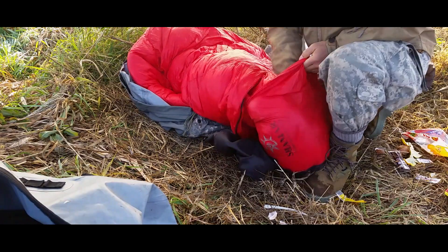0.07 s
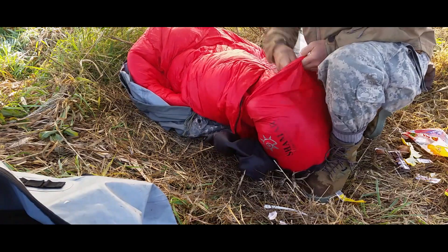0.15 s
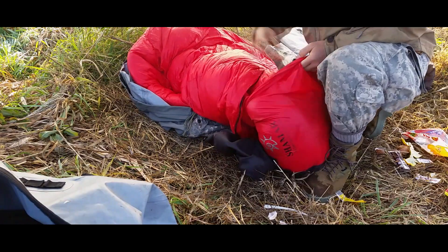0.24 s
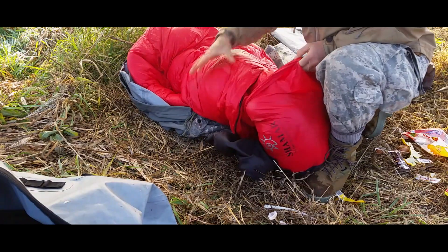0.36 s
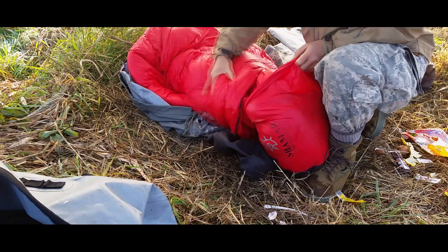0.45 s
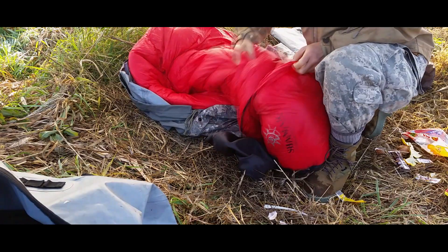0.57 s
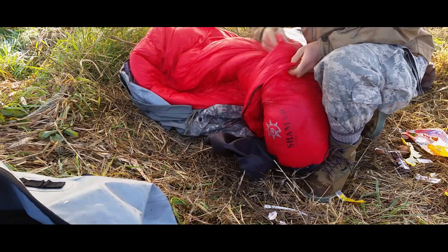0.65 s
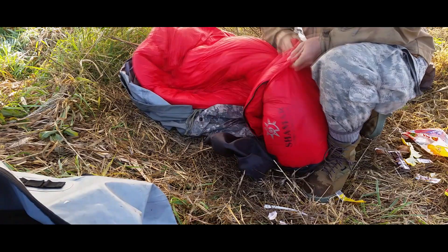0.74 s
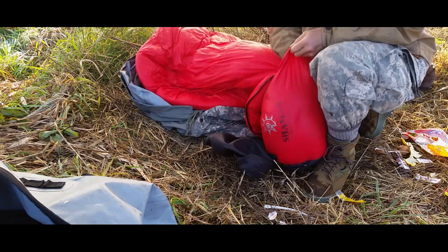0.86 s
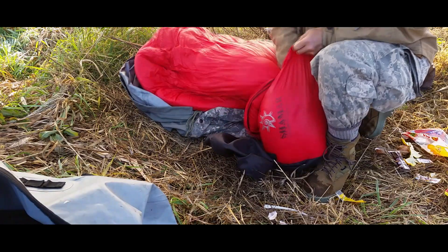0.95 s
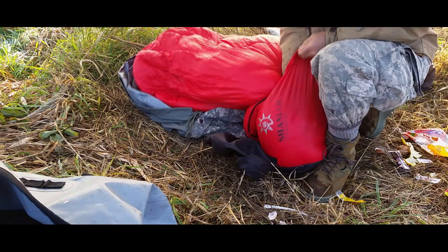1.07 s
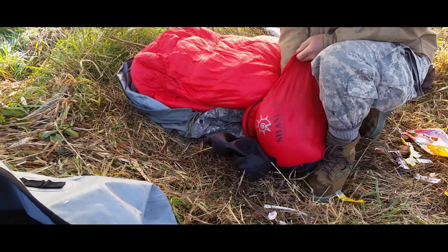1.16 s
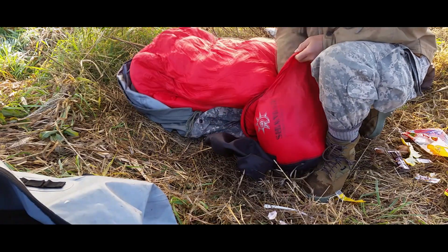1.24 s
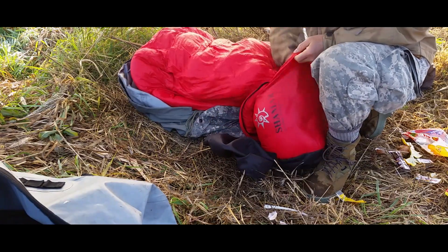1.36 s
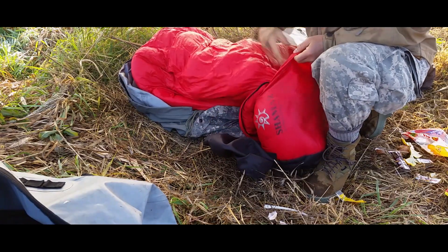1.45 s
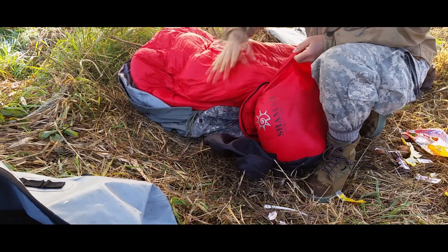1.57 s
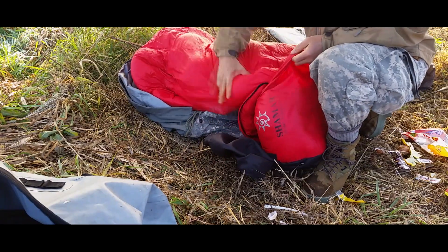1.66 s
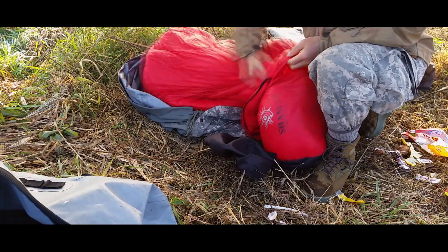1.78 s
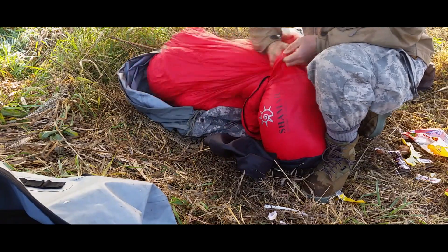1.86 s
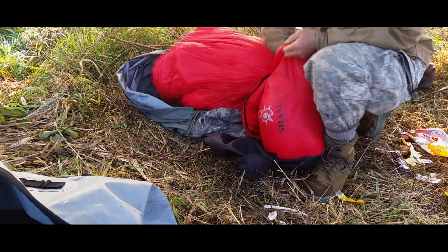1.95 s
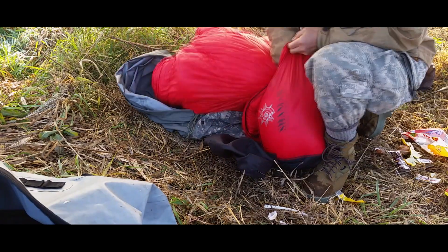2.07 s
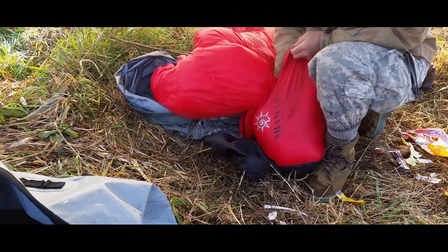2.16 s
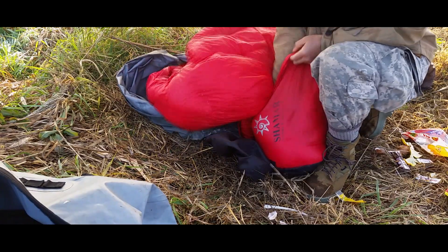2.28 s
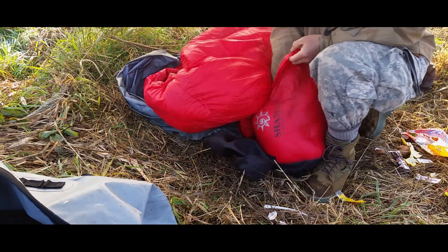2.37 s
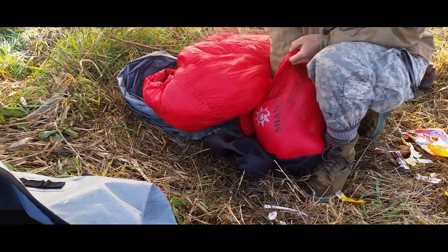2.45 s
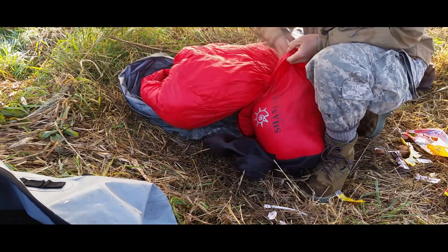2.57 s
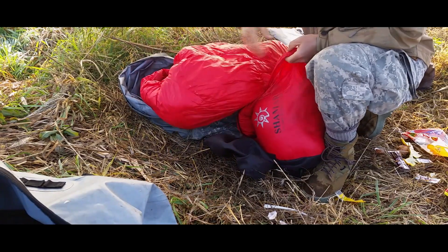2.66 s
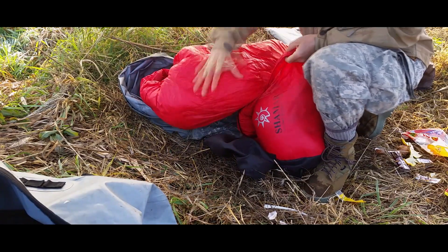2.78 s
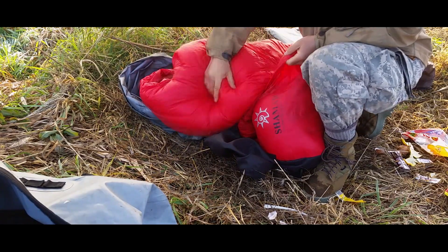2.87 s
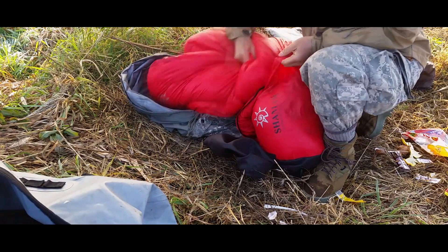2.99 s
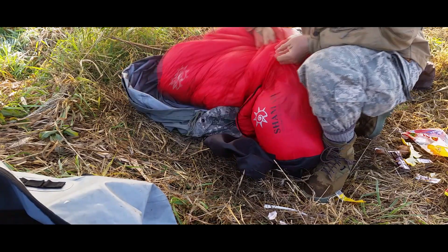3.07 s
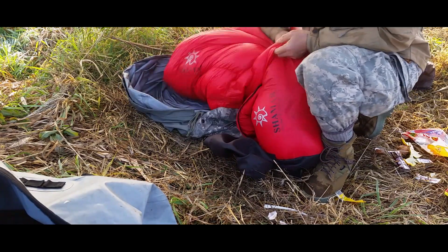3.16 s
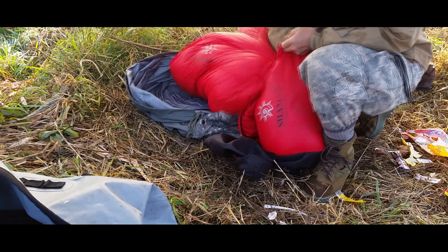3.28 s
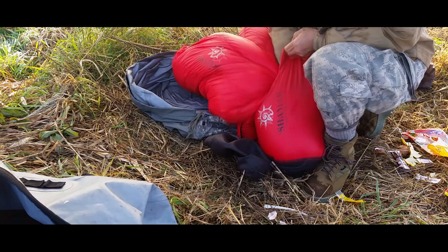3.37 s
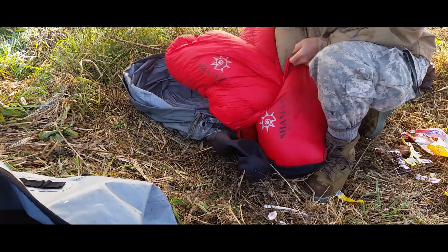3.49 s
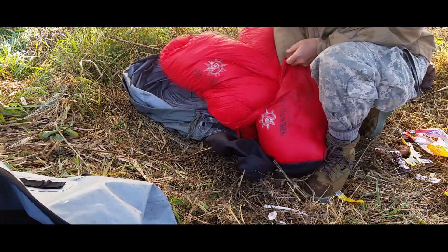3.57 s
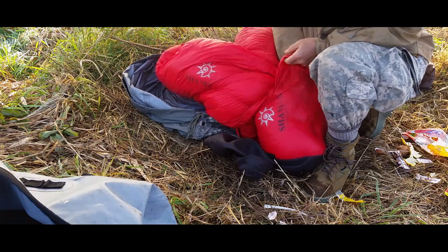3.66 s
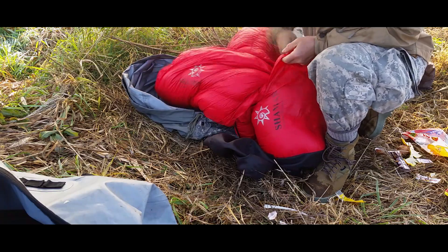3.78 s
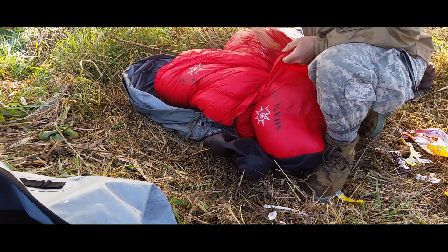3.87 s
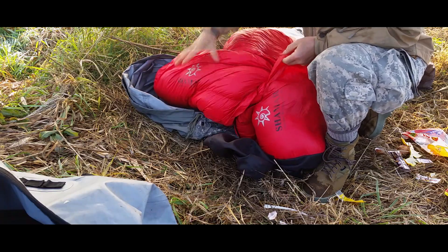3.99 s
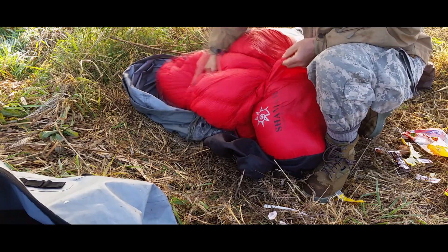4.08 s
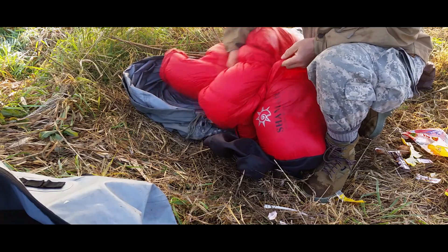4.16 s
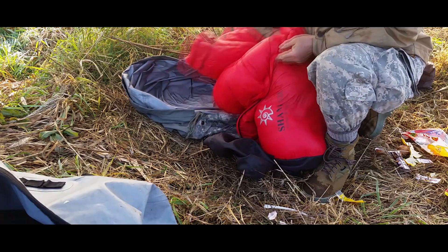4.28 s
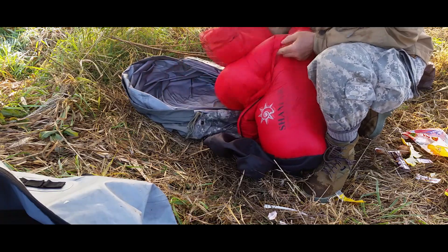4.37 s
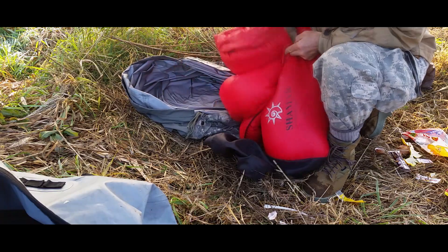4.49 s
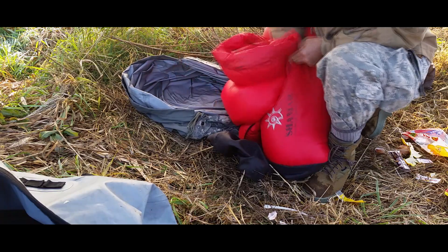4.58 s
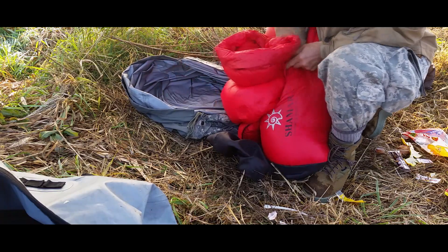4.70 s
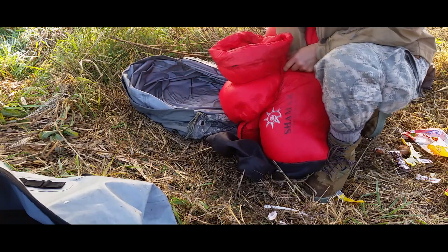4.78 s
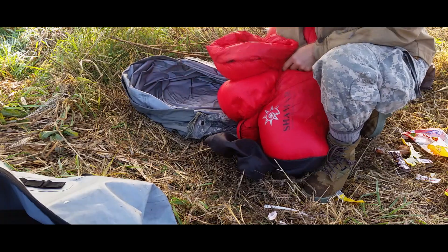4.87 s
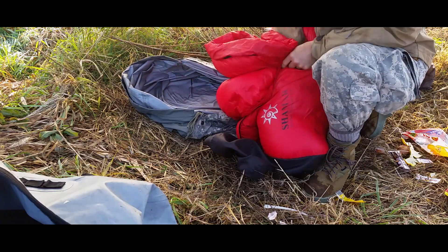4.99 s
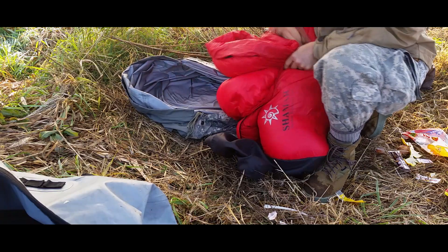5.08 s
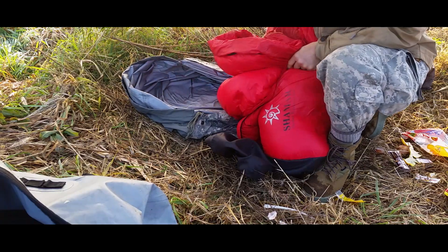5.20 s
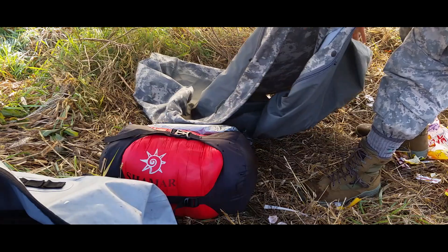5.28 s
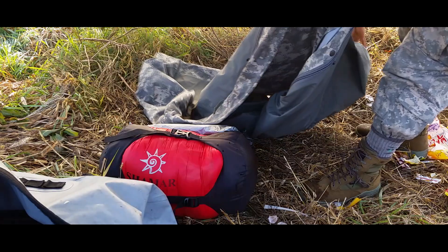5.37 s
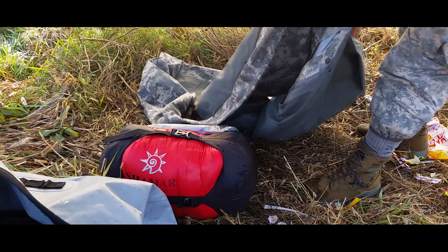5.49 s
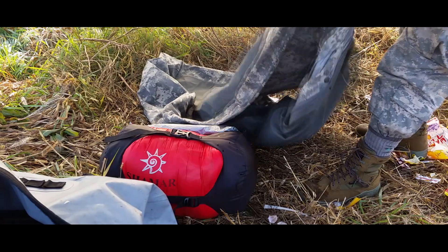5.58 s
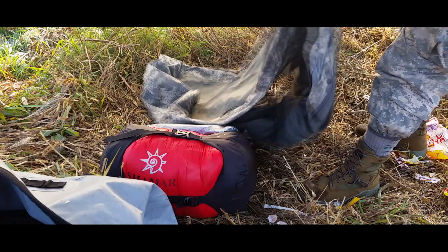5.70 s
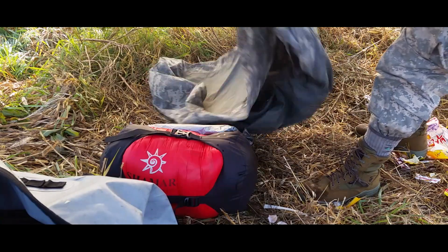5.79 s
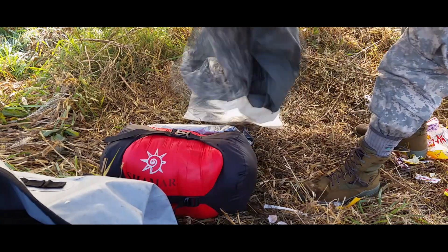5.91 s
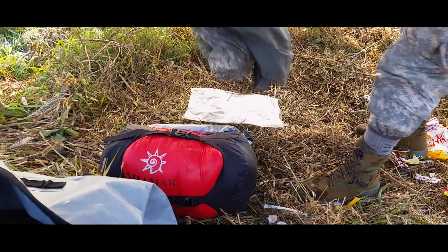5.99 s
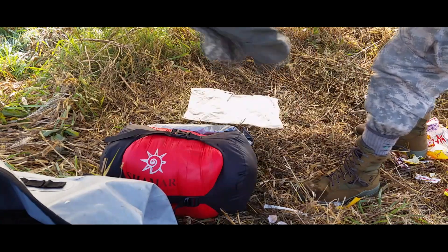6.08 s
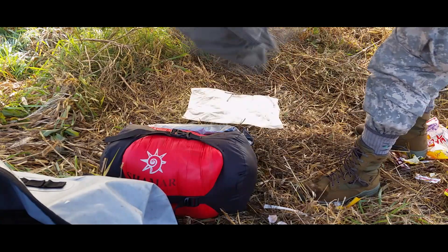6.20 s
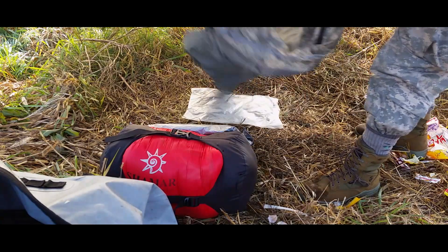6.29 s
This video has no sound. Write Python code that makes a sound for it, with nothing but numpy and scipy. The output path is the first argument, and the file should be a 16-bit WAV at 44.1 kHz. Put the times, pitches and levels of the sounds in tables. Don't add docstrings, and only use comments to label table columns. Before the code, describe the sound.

Nylon sleeping bag stuffed into its sack on dry grass in four swishing pushes, then a stiff cover shaken with loud crackling flaps close by.

```python
import sys
import numpy as np
from scipy import signal
from scipy.fft import rfft, irfft, next_fast_len
from scipy.io import wavfile
from scipy.ndimage import uniform_filter1d, map_coordinates

SR = 44100
rng = np.random.default_rng(int(sys.argv[2]) if len(sys.argv) > 2 else 0)


def how_loud(loudness_db):
    steps = np.asarray(loudness_db, float) / 20
    return 10 ** steps


def output_pcm(signal):
    pcm = np.clip(np.atleast_2d(signal).T, -1, 1) * 32767
    wavfile.write(sys.argv[1], SR, np.round(pcm).astype(np.int16))


N = 279726

COVER_S = 5.282
# centre_s, peak_db, pitch_hz, length_cycles
SLAPS = [(.337, -51, 302, .6), (0.469, -43.5, 128, 0.89), (.503, -45, 150, 0.5), (1.0022, -28, 336, 0.11),
         (1.0912, -31.5, 200, 0.27), (1.7073, -41.5, 298, 0.51), (1.809, -43, 250, 0.56),
         (2.181, -36.5, 200, 0.52), (2.2031, -24, 340, 0.11), (2.676, -53, 200, 0.42),
         (2.864, -41, 150, 0.67), (2.942, -51, 350, 1.5), (3.474, -37.5, 255, 0.47),
         (4.0952, -42, 60, 0.14), (4.0985, -31, 124, 0.62), (4.147, -45, 303, 0.56),
         (4.171, -48, 110, 0.46), (4.601, -34, 407, 0.33), (5.304, -54, 250, 0.67), (5.367, -42, 180, 0.55),
         (5.449, -36, 342, 0.22), (5.588, -46, 300, .8), (5.622, -47.5, 387, 1.3), (6.055, -36, 480, 1.2),
         (6.075, -29, 765, 1.4), (6.14, -18, 467, 1.8), (6.191, -16, 434, 1.33), (6.284, -24, 390, 1.2),
         (6.299, -13, 413, 0.85), (6.331, -21, 437, 1.06)]


def unit(x):
    return x / np.sqrt(np.mean(x ** 2) + 1e-20)


def along(points, hz):
    f, v = np.transpose(points)
    return np.interp(np.log(hz + 1), np.log(f + 1), v)


def wobble(rate):
    knots = rng.standard_normal(int(N * 400 / SR) + 4)
    return map_coordinates(knots, [np.arange(N) * rate / SR])


def together(*dbs):
    return 10 * np.log10(sum(how_loud(db) ** 2 for db in dbs) + 1e-12)


def ports(pair, spectrum, bag, lag_share):
    # pitch_hz, likeness for the bag (0-1), likeness for the wide cover (0-1),
    # left_lag_radians, left_minus_right_db
    port_table = [(30, .99, .99, 0, -.9), (350, .97, .96, 0, -.5), (1200, .85, .77, .3, .2),
                  (2750, .57, .6, 1.0, -2.2), (3800, .37, .35, 1.6, -2.8), (5400, .45, .22, 2.3, -6.4),
                  (7250, .55, .4, 3.15, -.3), (9000, .4, .1, 4.8, 6.2), (10300, .55, .13, 5.5, -4),
                  (12000, .4, .15, 5.7, -2), (14000, .5, .1, 6.5, -2.6)]
    hz, bag_alike, cover_alike, lag, side_db = np.transpose(port_table)
    m = next_fast_len(N + SR // 10)
    f = np.fft.rfftfreq(m, 1 / SR)

    def read(values):
        return along(np.c_[hz, values], f)

    turn = np.arccos(read(bag_alike if bag else cover_alike)) / 2
    mid, side = rfft(pair, m) * how_loud(along(spectrum, f)) * [np.cos(turn), np.sin(turn)]
    half = how_loud(read(side_db) / 2) * np.exp(-.5j * lag_share * read(lag))
    return irfft([(mid + side) * half, (mid - side) / half], m)[:, :N]


def heard(bag_pair, bag_spectrum, cover_pair, cover_spectrum):
    bag = unit(ports(bag_pair, bag_spectrum, True, lag_share=0.98))
    cover = unit(ports(cover_pair, cover_spectrum, False, lag_share=-.5))
    return np.where(np.arange(N) > COVER_S * SR, cover, bag)


def meadow(crumple_db):
    # pitch_hz, density_db
    far = [(15, -46), (25, -5.5), (91, 7), (160, -2), (210, -29), (350, -120)]
    # pitch_hz, density_db
    air = [(88, -34), (150, -2), (459, -12), (1460, -20.5), (4120, -24), (6180, -29.5), (7210, -29.5),
           (7940, -26.5), (13600, -20), (15000, -65)]
    lumps = how_loud(0.73 * wobble(14)) * rng.standard_normal((2, N))
    rumble = unit(ports(lumps, far, False, lag_share=0))
    hush = unit(ports(rng.standard_normal((2, N)), air, False, lag_share=0))
    traffic_db = -59.5 - 0.5 * wobble(2.85)
    pushed_air_db = -52.5 + 0.85 * (crumple_db + 49.5)
    return how_loud(together(traffic_db, pushed_air_db)) * rumble + how_loud(-61.5) * hush


def seam():
    # time_s, pitch_hz, level_db
    whistle = [(5.59, 5170, -95), (5.62, 5170, -67), (5.7, 5150, -66), (5.73, 5150, -61), (5.76, 5050, -68),
               (5.79, 5050, -95), (6.03, 5020, -95), (6.05, 5030, -65), (6.1, 5030, -62)]
    stop = (whistle[-1][0] + .01, 5030, -120)
    s, pitch_hz, level_db = np.transpose(np.vstack([whistle, stop]))
    t = np.arange(N) / SR
    hz = np.interp(t, s, pitch_hz) + 15 * wobble(60)
    db = np.interp(t, s, level_db) + 5.5 + 1.5 * wobble(30)
    return how_loud(db) * np.sin(2 * np.pi * np.cumsum(hz) / SR)


def snaps():
    # start_s, peak_db, pitch_hz, t60_s
    creases = [(.4455, -54, 5000, .03), (1.553, -43, 10600, .15), (1.556, -51, 1480, 0.076),
               (1.571, -44.5, 3000, .008), (1.7053, -40.5, 960, 0.026), (2.2, -42, 2000, 0.0034),
               (2.858, -35.5, 9500, 0.006), (2.858, -45, 1250, 0.059), (2.925, -45, 880, 0.33),
               (4.089, -42, 2200, 0.026), (4.0956, -35.5, 500, 0.016), (4.1445, -44, 1000, 0.056),
               (5.423, -44, 4000, .006), (5.766, -15, 10000, 0.0056), (5.587, -39, 8000, .006),
               (5.914, -25, 13000, .006), (5.9775, -18.5, 12000, 0.0048), (6.0725, -31, 990, 0.036),
               (6.148, -16, 11500, 0.0088), (6.154, -23, 6500, 0.0088), (6.158, -17, 1260, 0.053),
               (6.175, -22, 2480, 0.0042), (6.181, -8.5, 1800, 0.027), (6.22, -20.5, 2740, 0.021),
               (6.2483, -21, 2820, 0.01), (6.25, -19, 1390, 0.0066), (6.288, -20.5, 2380, 0.011),
               (6.335, -17, 1570, 0.025), (6.337, -17.5, 11400, 0.0066)]
    out = np.zeros((2, N + SR))
    t = np.arange(SR // 20) / SR
    for s, db, hz, t60 in creases:
        q = (hz / 1000) ** 0.32 / 1.21
        band = signal.iirpeak(hz, q, SR)
        decay = how_loud(-60 * t / t60) + how_loud(-20 - 15 * t / t60)
        noise = rng.standard_normal((2, len(t))) * decay
        tick = signal.lfilter(*band, signal.lfilter(*band, noise))
        out[:, round(s * SR):][:, :len(t)] += how_loud(db) * tick / np.abs(tick[0]).max()
    early = np.arange(N) < COVER_S * SR
    flat = [(100, 0)]
    bag = ports(out[:, :N] * early, flat, True, lag_share=1)
    cover = ports(out[:, :N] * ~early, flat, True, lag_share=-0.26)
    return bag + cover


def slaps(crumple_db):
    reach = SR // 40
    out = np.zeros(N + SR)
    t = np.arange(-reach, reach) / SR
    crackle_band = signal.butter(2, [500, 2800], "band", fs=SR)
    for s, db, hz, cycles in SLAPS:
        turns = hz * t * np.where(t < 0, 1.25, .85)
        push = -np.cos(2 * np.pi * turns) * np.exp(-(turns / cycles) ** 2)
        push *= np.sign(cycles - .2)
        grit = unit(signal.lfilter(*crackle_band, rng.standard_normal(len(t))))
        burst = grit * (t > -.0012) * how_loud(-60 * t / .01)
        crackle_db = crumple_db[round(s * SR)] + 0.5
        out[round(s * SR) - reach:][:len(t)] += how_loud(db) * push + how_loud(crackle_db) * burst
    return out[:N]


def motion():
    # start_s, end_s, slide_start_db, slide_end_db, crumple_over_slide_db
    grabs = [
        (.445, .57, -57, -61, -5),
        (1.647, 1.69, -62, -60, -2),
        (1.708, 1.93, -54, -57, -3.5),
        (2.846, 3.14, -59.5, -55, -1),
        (4.062, 4.08, -62, -58.5, -0.5),
        (4.082, 4.2, -53, -60, -4.5),
        (5.285, 5.38, -50, -55.5, -4.5),
    ]
    pushes = [
        (.945, 1.07, -43, -39.5, -7),
        (2.09, 2.21, -45, -39, -6),
        (3.33, 3.455, -43, -42, -5.5),
        (4.51, 4.61, -40.5, -39, -4.5),
    ]
    eases = [(0.0, .12, -55.5, -50, -8), (.14, .21, -50.5, -56, -6.5), (.61, .9, -56.5, -54.5, -2),
             (1.25, 1.47, -52, -51, -7), (1.565, 1.58, -61.5, -59.5, -0.5),
             (1.95, 2.07, -54.5, -51.5, -2.5), (2.33, 2.575, -54, -47, -7), (3.22, 3.3, -57.5, -49.5, 1.5),
             (3.62, 3.71, -55.5, -55.5, -2.5), (3.75, 3.92, -52.5, -60, -3.5), (4.3, 4.42, -55.5, -55, -1),
             (4.75, 4.9, -52.5, -52, -4.5), (4.95, 5.125, -54, -52, -4.5)]
    shakes = [
        (5.4, 5.53, -56.5, -60.5, -1.5),
        (5.55, 5.76, -55, -41, -4.5),
        (5.79, 5.865, -46, -40, -5.5),
        (5.875, 5.98, -43.5, -40.5, -1.5),
        (6.03, 6.1, -44, -49.5, -3),
        (6.135, 6.185, -31.5, -29.5, 1.5),
        (6.205, 6.245, -34, -38.5, 3),
        (6.265, 6.293, -35, -34.5, -0.5),
        (6.325, 6.35, -39, -33, 3),
    ]
    kinds = [(grabs, 0.0056, 0.09, 0.099, 0.1), (pushes, 0.11, .085, 3.0, 1.7),
             (eases, 0.33, 0.08, 2.2, -1), (shakes, 0.06, 0.078, 0.96, -2.4)]
    t = np.arange(0, N, 16) / SR
    slides, crumples = [], []
    for rows, attack_s, release_s, arch_db, gain_db in kinds:
        for start, end, start_db, end_db, crumple_db in rows:
            u = np.clip((t - start) / (end - start), 0, 1)
            held = start_db + (end_db - start_db) * u - 20 * np.maximum(start - t, 0) / attack_s
            gone = 20 * np.maximum(t - end, 0) / release_s
            slides.append(held + arch_db * np.sin(np.pi * u) - gone)
            crumples.append(held + crumple_db + gain_db * (u - .5) - gone / 1.49)
    puffs = together(*[db - 13.5 - 20 * np.abs(t - s) / 0.026 for s, db, _, _ in SLAPS])
    levels = (together(*slides), together(*crumples), puffs)
    slide_db, crumple_db, puff_db = [np.interp(np.arange(N) / SR, t, v) for v in levels]
    billow_db = 0.35 * np.maximum(crumple_db + 41, 0)
    flap_db = together(crumple_db - 3 + billow_db + 1.22 * wobble(14), puff_db)
    return slide_db, crumple_db + 1.1 * wobble(18), flap_db


def whine(hz, width):
    m = next_fast_len(N + SR // 4)
    f = np.fft.rfftfreq(m, 1 / SR)
    blur = irfft(rfft(rng.standard_normal((4, N)), m) / (1 + (f / width) ** 2), m)[:, :N]
    turn = 2 * np.pi * np.cumsum(hz) / SR
    return unit(blur[:2] * np.cos(turn) + blur[2:] * np.sin(turn))


def slips(spread_db, clump_db, clump_rate, patchy_db, patch_bins):
    starts = (rng.random(N) < clump_rate / SR) * rng.random(N)
    clumps = unit(signal.lfilter([1], [1, -np.exp(-clump_rate / SR)], starts))
    uneven = uniform_filter1d(rng.exponential(size=N), size=3)
    size = how_loud(spread_db * uneven + clump_db * clumps)
    z = signal.stft(size * rng.standard_normal((2, N)), nperseg=256)[2]
    patches = uniform_filter1d(rng.standard_normal(z.shape[1:]), patch_bins, axis=0)
    patches = uniform_filter1d(patches, size=9, axis=1)
    return unit(signal.istft(z * how_loud(patchy_db * unit(patches)), nperseg=256)[1][:, :N])


def cloth(slide_db, crumple_db, flap_db):
    # pitch_hz, density_db
    weave = [(2650, -19), (4500, -16.5), (5450, -14), (7330, -16), (8690, -7), (10400, -3), (12000, -6.5),
             (14700, -9), (15300, -9), (16000, -20)]
    # pitch_hz, density_db
    bag_creases = [(290, -11), (500, -18), (630, -12.5), (970, -8), (3230, -10.5), (4260, -14.5),
                   (5430, -15.5), (7000, -10.5), (9100, -25), (15400, -120)]
    # pitch_hz, density_db
    cover_creases = [(290, -51), (500, -13), (540, -15), (878, -10.5), (1110, -7.5), (1480, -10),
                     (2740, -13), (4450, -20.5), (7000, -23.5), (9100, -53), (15400, -120)]
    # pitch_hz, density_db
    bag_flap = [(76, -27), (130, -2), (280, -4), (323, -6.5), (700, -10.5), (910, -11.5), (1540, -120)]
    # pitch_hz, density_db
    cover_flap = [(76, -24), (130, -2), (204, -3.5), (356, -3.5), (539, -9.5), (700, -7.5), (910, -5),
                  (1540, -120)]
    hiss = slips(spread_db=3, clump_db=1.3, clump_rate=90, patchy_db=1.6, patch_bins=8)
    weave_hz = 10640 + 178.5 * np.maximum(slide_db + 42, -15) + 412 * wobble(18)
    sing_db = np.clip(.8 * (slide_db + 40) - 12, -40, -13) + 2 * wobble(40)
    on_grass = np.arange(N) < 6.05 * SR
    hiss += how_loud(sing_db) * on_grass * whine(weave_hz, width=400)
    soft = slips(spread_db=3, clump_db=1.5, clump_rate=110, patchy_db=1.5, patch_bins=6)
    stiff = slips(spread_db=3, clump_db=2.2, clump_rate=170, patchy_db=2.5, patch_bins=6)
    puffs = how_loud(1.64 * wobble(60)) * rng.standard_normal((2, N))
    slide = how_loud(slide_db + 2.5) * heard(hiss, weave, hiss, weave)
    crumple = how_loud(crumple_db - 0.5) * heard(soft, bag_creases, stiff, cover_creases)
    flap = how_loud(flap_db) * heard(puffs, bag_flap, puffs, cover_flap)
    return slide + crumple + flap


def scene():
    slide_db, crumple_db, flap_db = motion()
    background = meadow(crumple_db) + seam()
    knocks = snaps() + how_loud([[-.3], [.3]]) * slaps(crumple_db)
    return background + knocks + cloth(slide_db, crumple_db, flap_db)


def band_limit(x):
    return signal.sosfilt(signal.butter(12, 17060, fs=SR, output="sos"), x)


def record(dry):
    # up_to_db, limit_hz
    tops = [
        (-54, 14500),
        (-41, 15200),
        (0, 15850),
    ]
    hz, t, z = signal.stft(dry, SR, nperseg=1024)
    power = np.abs(z).mean(axis=0) ** 2
    treble = uniform_filter1d(power[hz > 8000].sum(axis=0), size=3)
    treble_db = 10 * np.log10(treble * 1.3 + 1e-12)
    level, top = np.transpose(tops)
    limit = top[np.minimum(np.searchsorted(level, treble_db), len(top) - 1)]
    limit[np.abs(t - 5.766) < .006] = 16900
    kept = signal.istft(z * (hz[:, None] < limit), SR, nperseg=1024)[1][:, :N]
    return band_limit(kept)


dry = scene()
out = record(dry)
output_pcm(out)
```